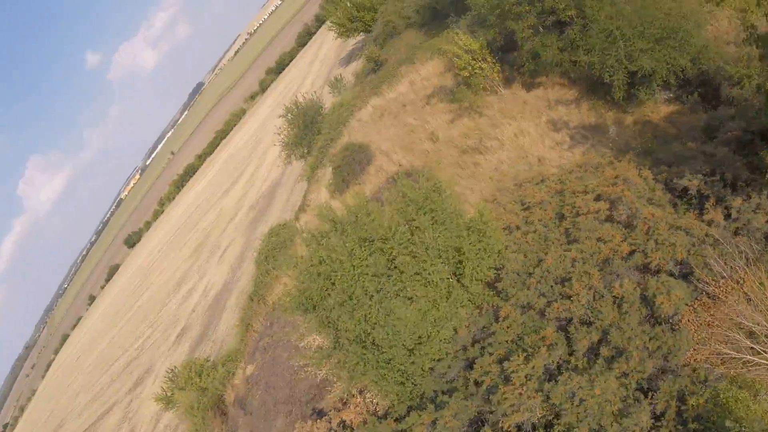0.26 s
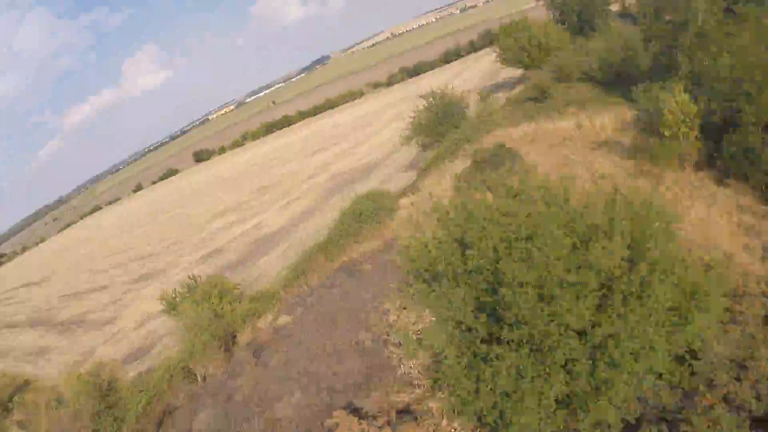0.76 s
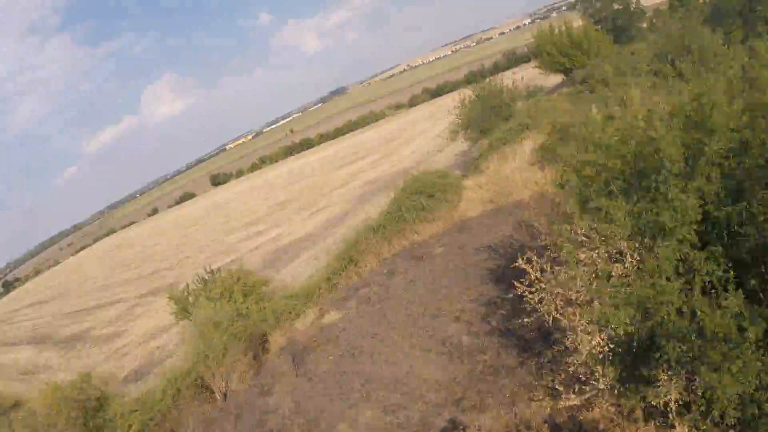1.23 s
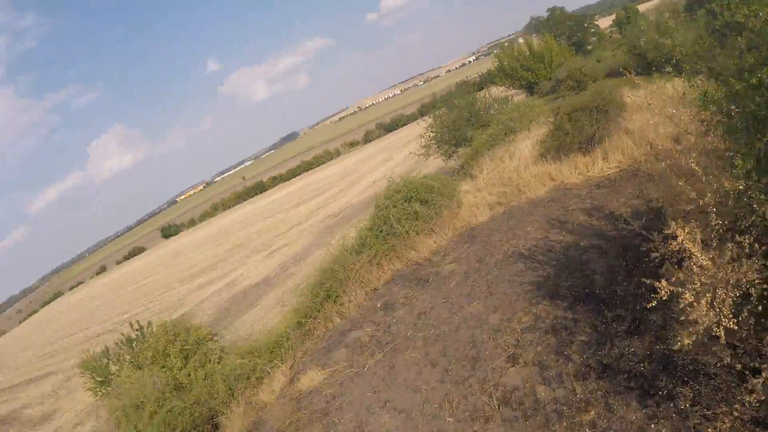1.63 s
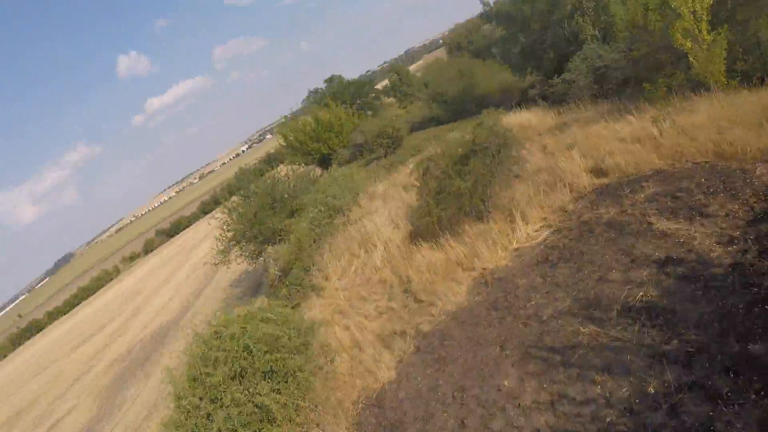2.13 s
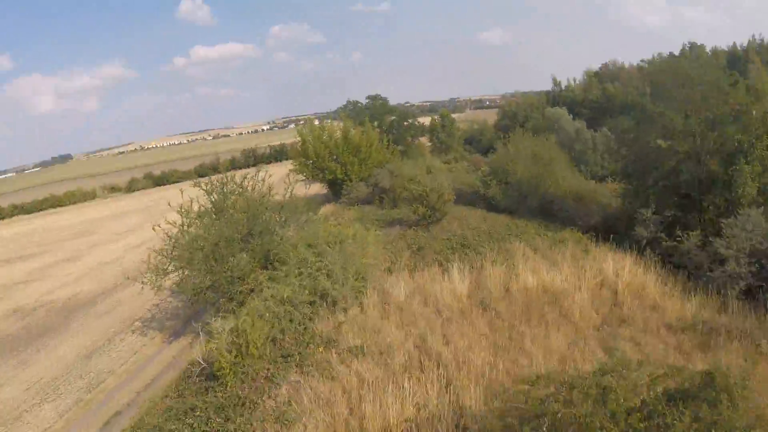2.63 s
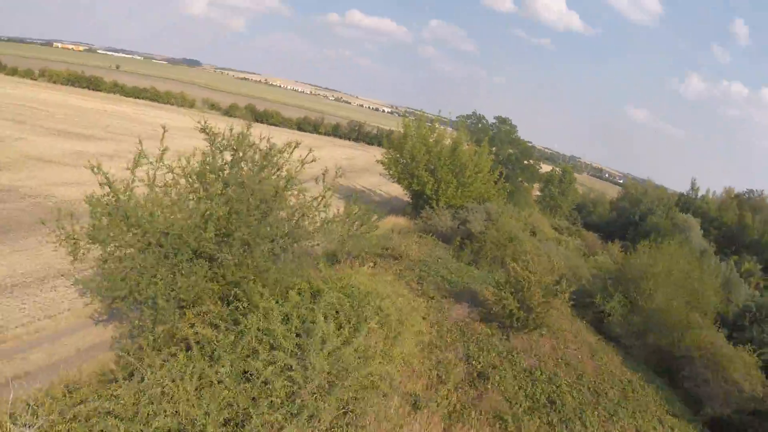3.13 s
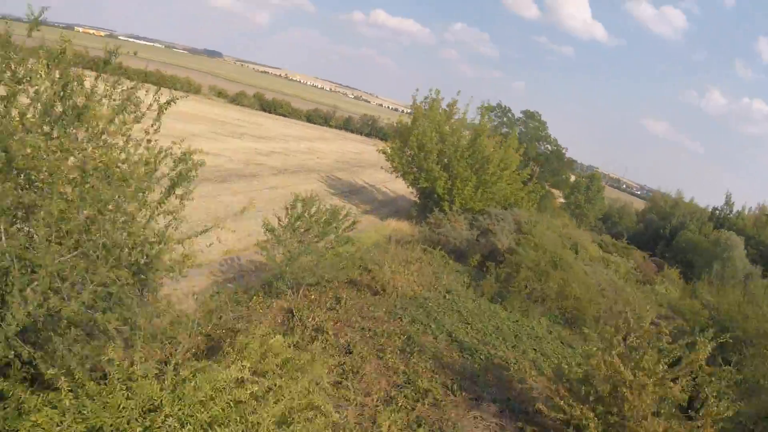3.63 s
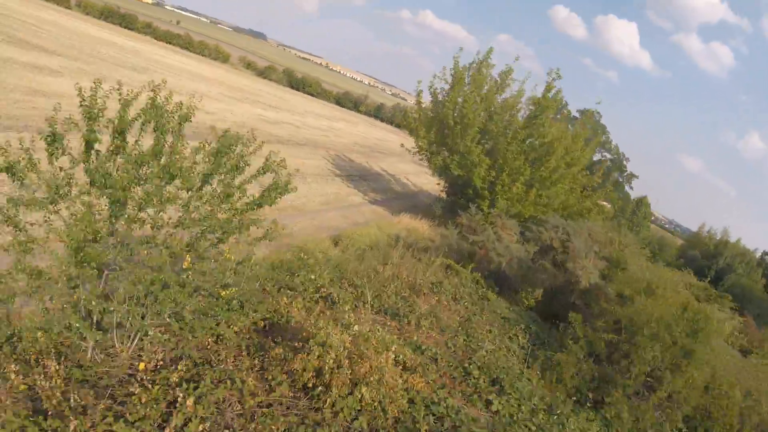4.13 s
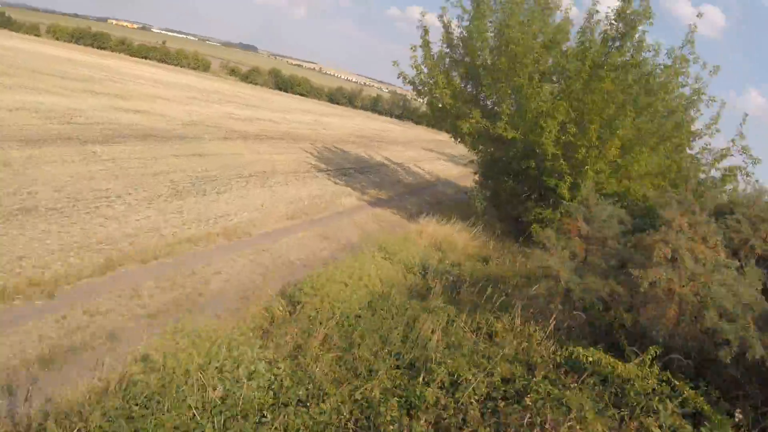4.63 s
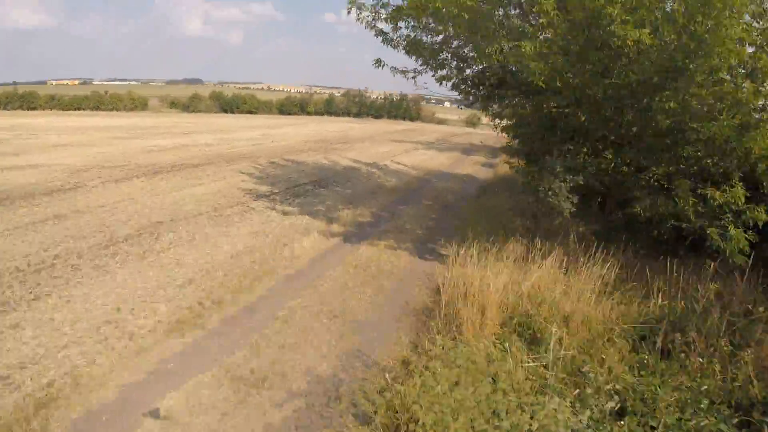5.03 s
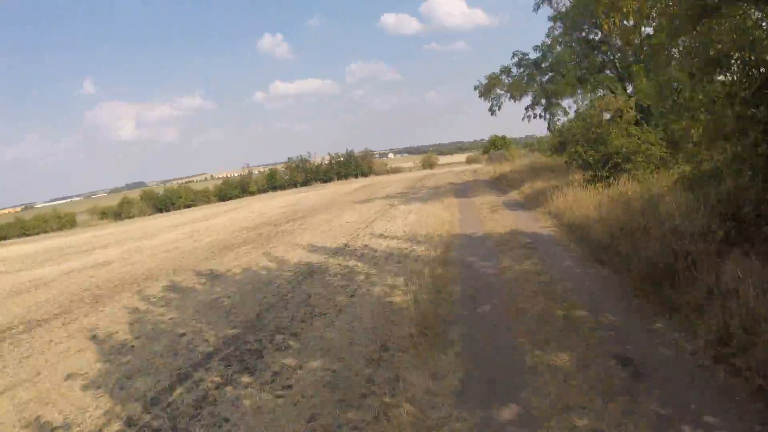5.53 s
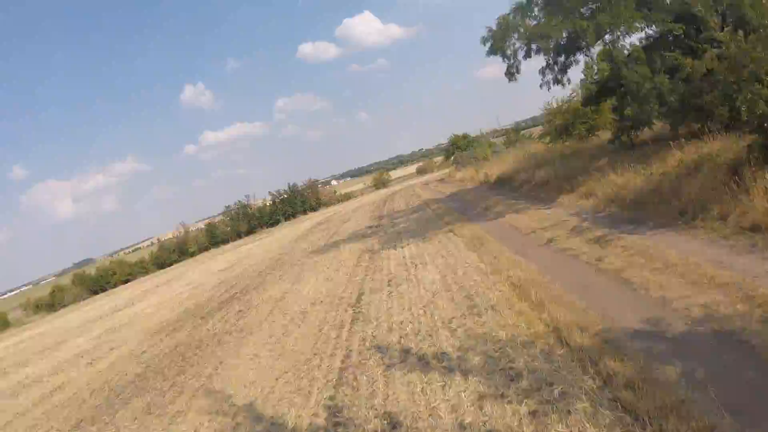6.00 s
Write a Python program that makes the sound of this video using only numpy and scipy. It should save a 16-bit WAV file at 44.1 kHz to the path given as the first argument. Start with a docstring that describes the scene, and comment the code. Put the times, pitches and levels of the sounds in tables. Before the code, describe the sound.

Four small propellers hum and buzz close up outdoors, dropping low, screaming upward, falling back, then climbing again to a wavering cruise amid airy hiss.

```python
"""Four three-blade rotors of a racing quadcopter idle, spin up, ease off and cruise, near a camera on its frame.
Each rotor turns at its own speed, so the hums beat; each is a sum of tones at multiples of its shaft speed.
Filtered noise adds the pulsing hiss of air over the blades, brief shudders and rings of the frame,
the airstream rumbling on the camera case, and a thin whistle that glides about 7 kHz."""
import sys
import numpy as np
from scipy import signal
from scipy.fft import rfft, irfft, next_fast_len
from scipy.io import wavfile
from scipy.ndimage import uniform_filter1d, minimum_filter1d

SR = 44100
rng = np.random.default_rng(int(sys.argv[2]) if len(sys.argv) > 2 else 0)


def unload_wav(signal):
    """Save mono or channel-first audio to the path in sys.argv[1] as 16-bit WAV at rate SR, clipped to [-1, 1]."""
    wavfile.write(
        sys.argv[1],
        SR,
        np.round(np.clip(np.atleast_2d(signal).T, -1, 1) * 32767).astype(np.int16),
    )


N = 276066
TIME = np.arange(N) / SR  # seconds

# The badly balanced rotor, which hums loudest and mostly turns slower than the second.
# Each row: time in seconds, shaft speed in Hz (turns per second), swell of its hum in dB.
LOUD_ROTOR = [(0, 80.96, -7), (.24, 75, -11), (.3, 83, -13), (.47, 88, -9), (.72, 80.3, -17),
              (.8, 88.1, -14), (.92, 88.7, -16), (1.05, 130.5, 4.5), (1.11, 144, -12), (1.17, 181, -10),
              (1.25, 179, -9), (1.3, 207, -3), (1.75, 237, -2.5), (1.92, 236.7, 2), (2.18, 246.8, 0),
              (2.28, 193, -1.5), (2.38, 185.9, -0.5), (2.52, 154.5, -1.5), (3.82, 154.1, 1),
              (3.97, 180.5, 0.5), (4.13, 204.6, 3), (4.33, 210.5, -1), (4.5, 192.9, 0.5),
              (5.22, 207.4, -1.5), (5.55, 186.5, -1.5), (6.05, 192.9, 0), (6.26, 187.2, 1.5)]


def rotors(speeds, shake_db):
    """Add the tones of all four rotors, and the pulsing of their blades."""
    # The four rotors: loud one, the one that follows the throttle directly, third, fourth.
    # Each row: once-a-turn hum in dB, twice-a-turn hum in dB, its rise in dB per octave of speed,
    # blade-pass tone in dB, its rise in dB per octave, buzz in dB, whine in dB.
    # The two rises count from hover speed; the whine level is for cruise speed.
    rotor_levels = [(-10, -18, 1.5, -19, -15.5, -35.5, -56.5), (-18, -32.5, 1.5, -25.5, 3, -38.5, -48),
                    (-21.5, -38, 15.5, -29.5, 2.5, -36, -53.5), (-25, -28.5, 6.5, -28.5, 1, -39, -57.5)]
    # Changing whine of the second rotor.
    # Each row: time in seconds, swell in dB, frequency in Hz where the whine is strongest.
    second_whine = [(1.2, 3.5, 1700), (1.7, 6, 2150), (1.98, 5, 3202), (2.15, -6, 2900), (2.23, -1, 3496),
                    (2.6, -7, 1100), (4.9, 0, 1350), (5.12, -6.5, 4101), (5.7, -1, 2802)]
    _, hum_swell_db = curves(LOUD_ROTOR)
    whine_swell_db, whine_hz = curves(second_whine)
    loud = rotor(speeds[0], rotor_levels[0], shake_db, strong_hz=1250,
                 hum_swell_db=hum_swell_db, drone_boost_db=drone_db())
    second = rotor(speeds[1], rotor_levels[1], shake_db, whine_hz, whine_swell_db=whine_swell_db)
    third = rotor(speeds[2], rotor_levels[2], shake_db, strong_hz=1550)
    fourth = rotor(speeds[3], rotor_levels[3], shake_db, strong_hz=2400)
    tones, chop = np.sum((loud, second, third, fourth), axis=0)
    return tones, chop / chop.std()


def rotor(hz, levels, shake_db, strong_hz, hum_swell_db=0, drone_boost_db=0, whine_swell_db=0):
    """One rotor's hum, buzz and flickering whine, and the pulsing of its blades."""
    hover_hz = 150
    punch_db = 7  # the blades bite harder until the airflow has caught up
    wander, punch_wander, flutter = .0035, 0.008005, 0.00501  # shares of the shaft speed
    once_db, twice_db, twice_rise, blade_db, blade_rise, buzz_db, whine_db = levels
    load = punch(hz)
    angle = spin(hz, wander + punch_wander * load, flutter)  # a punch unsettles the speed
    octaves = np.log2(hz / hover_hz)
    hum_db = (once_db + hum_swell_db,
              twice_db + twice_rise * octaves + hum_swell_db,
              blade_db + blade_rise * np.maximum(octaves, 0) + drone_boost_db + punch_db * load)
    low_tones = hum(angle, hz, hum_db, waver_db=1.5) + buzz(angle, hz, buzz_db + shake_db, blade_db=3.5)
    flickering_db = whine_db + whine_swell_db + effort_db(hz) + 1.5 * walk(11)
    tones = low_tones + whine(angle, hz, flickering_db, strong_hz, rough=.42)
    pulsing = partial(angle, order=3) + partial(angle, order=1)
    return tones, pulsing


def hum(angle, hz, levels_db, waver_db):
    """Unbalance and three blades shake the frame 1, 2 and 3 times a turn; its resonances lift passing tones."""
    # How the frame carries the hums to the camera, with its main resonance near 255 Hz.
    # Each row: frequency in Hz, gain in dB.
    frame_response = [(75, -12.5), (125, -1), (155, -2), (200, -1.5), (236, -3), (255, 7.5), (275, -2.5),
                      (310, -2), (400, -3.5), (470, 1), (540, 1.5), (600, -2.5), (720, -2.5), (950, -16.5)]
    total = 0
    for order, db in enumerate(levels_db, 1):
        level = undb(db + waver_db * walk(14))
        total = total + response(frame_response, order * hz) * level * partial(angle, order)
    return total


def buzz(angle, hz, db, blade_db, count=10):
    """Shaft orders 4 to 9 come through the case, which passes little above 1 kHz; blade orders are stronger."""
    # How the case passes the buzz. Each row: frequency in Hz, gain in dB.
    case_response = [(300, -12), (450, 10.5), (620, 0.5), (760, -8.5), (930, -16), (1080, -23),
                     (1300, -34.5), (2500, -57.5)]
    tones = 0
    for order in range(4, count):
        blade_boost = undb(blade_db * (order % 3 == 0))
        tones = tones + response(case_response, order * hz) * blade_boost * partial(angle, order)
    return tones * undb(db + 2.8 * walk(22))


def whine(angle, hz, db, strong_hz, rough, octaves=0.56, rest_db=-13, count=11):
    """Overtones of the blade passage, loudest in one region, roughened by the eddies that the blades cut."""
    # Overall tone colour of the whine. Each row: frequency in Hz, gain in dB.
    blade_response = [(700, -4.5), (1100, 0), (1750, -0.5), (2150, 0.5), (2700, -1.5), (3650, -3),
                      (4500, -3.5), (6400, -10), (7300, -15), (10000, -37.5)]
    tones = 0
    for order in 3 * np.arange(2, count):  # three blades pass in each turn
        nearness = np.exp(-(np.log2(order * hz / strong_hz) / octaves) ** 2)
        region_gain = undb(rest_db * (1 - nearness))
        tones = tones + response(blade_response, order * hz) * region_gain * partial(angle, order)
    return tones * undb(db) * (1 + rough * walk(70))


def punch(hz):
    """How far, 0-1, a shaft runs ahead of the airflow it draws, which follows with a lag."""
    full_lead_hz, inflow_lag_s = 35.3, 0.21
    keep = np.exp(-1 / (inflow_lag_s * SR))
    inflow_hz = hz[0] + signal.lfilter([1 - keep], [1, -keep], hz - hz[0])
    return np.clip((hz - inflow_hz) / full_lead_hz, 0, 1)


def effort_db(hz):
    """A rotor whines more the faster it turns, and while it brakes."""
    cruise_hz, rise_db_per_octave = 240, 21
    brake_db, full_brake_hz_per_s = 3.5, 550
    slowing = -np.gradient(uniform_filter1d(hz, size=2000)) * SR  # Hz per second
    return rise_db_per_octave * np.log2(hz / cruise_hz) + brake_db * np.clip(slowing / full_brake_hz_per_s, 0, 1)


def drone_db():
    """Boost of the loud rotor's blade-pass tone: each drone sets in quickly, holds and dies away."""
    # Near idle the loud rotor's blade-pass tone swells into a loud drone. # Each row: start in seconds, end in
    # seconds, boost in dB.
    drones = [(0.3, 0.628, 9), (0.81, 0.985, 9)]
    attack_s, release_s = .03, 0.21
    total = 0
    for start, end, db in drones:
        nearest_edge = np.minimum((TIME - start) / attack_s, (end - TIME) / release_s)
        total = total + db * np.clip(nearest_edge + .5, 0, 1)
    return total


def shaft_speeds():
    """Speeds of the four rotors in Hz; steering sets the last two against the throttle."""
    # Throttle: idle, punch, ease off, cruise. Each row: time in seconds, second rotor's speed in Hz.
    throttle_path = [(0, 113), (.88, 89), (1.0, 132.5), (1.1, 212.9), (1.2, 263), (1.35, 284.9),
                     (1.55, 297.3), (1.87, 299), (2.18, 310), (2.3, 223.6), (2.48, 168), (3.82, 179),
                     (4.15, 244.8), (4.36, 243.7), (4.47, 225), (5.0, 240), (5.13, 258.6), (5.3, 252.5),
                     (5.5, 229), (6.0, 237), (6.26, 237.1)]
    # Each row: time in seconds, third rotor's speed ratio to the throttle, fourth rotor's ratio.
    steering = [(0, 1.095, 0.9), (.87, 1.4, 1.56), (1.02, .88, .95), (1.2, .8, 1.01), (1.5, 0.95, 0.94),
                (2.15, 0.83, 0.86), (2.5, 0.91, 0.93), (3.8, .92, 0.91), (4.2, 0.9, 0.88),
                (4.8, 1.033, 1.01), (6.26, 1.09, 0.87)]
    loud, _ = curves(LOUD_ROTOR)
    throttle, = curves(throttle_path)
    third, fourth = curves(steering)
    return loud, throttle, third * throttle, fourth * throttle


def spin(hz, wander, flutter):
    """Shaft angle in radians; the flight controller's nudges are random slow and fast speed changes."""
    speed = hz * (1 + wander * walk(9.63) + flutter * walk(55.2))
    return 2 * np.pi * (np.cumsum(speed) / SR + rng.random())


def partial(angle, order):
    """Unit-rms tone at a multiple of the shaft speed, with a random phase."""
    return np.sqrt(2) * np.sin(order * angle + 2 * np.pi * rng.random())


def frame():
    """The arms shudder briefly in gusts, and the motors ring thinly near idle: noise in narrow bands."""
    # Gusts. Each row: time of the peak in seconds, level in dB, half length in seconds.
    shudders = [(.93, -14.5, 0.048), (1.18, -16.5, 0.077), (2.22, -21, 0.0631), (4.23, -8, 0.022),
                (4.385, -11.5, 0.0507), (5.1, -6, 0.029)]
    # Thin rings near idle. Each row: time of the peak in seconds, level in dB, half length in seconds.
    idle_rings = [(.37, -51.5, 0.055), (.53, -60, 0.083), (.91, -52.5, .025)]
    return swells(shudders) * ringing(245.0, 47) + swells(idle_rings) * ringing(5830, 70)


def airflow(buffet_db, wash_db, rush_db, hiss_db, shake_db, chop):
    """Wind rumbles on the case and rings its cavity; the air noise of the blades pulses as they pass."""
    # Tone colours of wind on the case, its cavity, propeller wash, rush over the blades and
    # blade-tip hiss. Each row: frequency in Hz, relative level in dB.
    buffet_spectrum = [(15, -16.5), (30, -4.5), (60, 4.5), (100, 5.5), (170, 0.5), (260, -7.5), (400, -16),
                       (900, -58.5)]
    cavity_spectrum = [(100, -10), (220, -4), (280, 5.5), (360, -4), (460, -3.5), (530, 0), (670, -0.5),
                       (790, -5.5), (900, -11.5), (1050, -33), (1600, -48), (3000, -73)]
    wash_spectrum = [(500, 0), (1000, 2.5), (1300, 2.5), (1800, -2.5), (2300, -7.5), (2750, -8),
                     (3400, -18), (5000, -39)]
    rush_spectrum = [(1500, -14), (2300, -8), (2900, 0), (3700, -1.5), (4700, -2), (5400, -2), (6500, -20),
                     (9000, -43.5)]
    hiss_spectrum = [(4000, -26.5), (5000, -11), (5600, -0.5), (6300, 2.5), (7300, -4.5), (8700, -9.5),
                     (10000, -17.5), (12000, -29.5), (15000, -53.5)]
    # The airstream sizzles briefly on an edge.
    # Each row: time of the peak in seconds, level in dB, half length in seconds.
    sizzles = [(2.75, -60, 0.1), (3.05, -48, 0.24)]
    buffet = coloured(buffet_spectrum) * undb(buffet_db + 2.5 + 2.6 * walk(12.0))
    cavity = coloured(cavity_spectrum) * undb(-23.0 + 0.1 * shake_db + 0.76 * walk(29.0))
    wash = coloured(wash_spectrum) * undb(wash_db + 1.0)
    rush = coloured(rush_spectrum) * undb(rush_db)
    hiss = coloured(hiss_spectrum) * undb(hiss_db)
    sizzle = swells(sizzles) * ringing(7240, 1100)
    eddies = undb(.5 * walk(60) + 0.79 * walk(28))
    blade_air = (wash + rush + hiss + sizzle) * (1 + 0.15 * chop) * eddies
    return buffet + cavity + blade_air


def air_levels(mean_hz):
    """Relative levels in dB of buffeting, wash, rush and hiss, from rotor speed, wind and turbulence."""
    # Air noise grows with the mean rotor speed. Each row: shaft speed in Hz, relative level in dB of
    # propeller wash, of rush over the blades, of blade-tip hiss.
    air_by_speed = [(108.9, -42, -58.5, -59), (163, -42, -46, -48.5), (225, -39.5, -46.5, -45),
                    (286, -33.5, -45.5, -42.5)]
    # Roughness of the air flown through. Each row: time in seconds, dB over calm cruise.
    turbulence = [(0, 9.5), (.27, 7), (.34, -1.5), (.62, -5.5), (.88, 0), (1.04, 4.5), (1.25, 1.5),
                  (1.9, 5), (2.4, 2), (3.0, 1.5), (3.6, -1.5), (4.65, -3.5), (4.8, 0), (5.35, -1),
                  (6.26, 4.5)]
    # Wind on the case, stronger in the opening dive. Each row: time in seconds, relative level in dB.
    headwind = [(0, -23.5), (1.3, -25.5), (2.4, -27.5), (6.26, -27.5)]
    wash_share, hiss_share, buffet_share = 0.3, 0.47, 0.17  # dB for each dB of turbulence
    speed, *columns = np.transpose(air_by_speed)
    wash_db, rush_db, hiss_db = (np.interp(mean_hz, speed, c) for c in columns)
    rough_db, = curves(turbulence)
    wind_db, = curves(headwind)
    return (wind_db + buffet_share * rough_db,
            wash_db + wash_share * rough_db,
            rush_db + rough_db,
            hiss_db + hiss_share * rough_db)


def whistle(width_hz=110):
    """A narrow band of noise that glides about 7 kHz: slow noise shifted up by a gliding tone."""
    # A thin, wavering whistle high over the motors.
    # Each row: time in seconds, pitch in Hz, level in dB.
    whistle_path = [(0, 7200, -85), (.42, 7350, -68), (.62, 6750, -69), (.8, 6900, -79), (4, 7210, -69),
                    (4.17, 7227, -54), (4.9, 7200, -61.5), (5.13, 7336, -51), (5.4, 7097, -61),
                    (6.26, 7130, -63)]
    hz, db = curves(whistle_path)
    angle = 2 * np.pi * np.cumsum(hz) / SR
    return undb(db) * (walk(width_hz) * np.sin(angle) + walk(width_hz) * np.cos(angle))


def undb(db):
    """Decibels to gain."""
    return 10 ** (np.asarray(db) / 20)


def curves(table):
    """Each column of a table after its times, joined by straight lines in time."""
    s, *columns = np.transpose(table)
    return [np.interp(TIME, s, c) for c in columns]


def response(points, hz):
    """Gain of a spectrum at the given frequencies; silent above its last point."""
    f, db = np.transpose(points)
    return undb(np.interp(np.log(np.maximum(hz, 1)), np.log(f), db, right=-np.inf))


def swells(table):
    """Sum of smooth rises and falls, one for each row of time, level in dB and half length."""
    return sum(undb(db) * np.exp(-((TIME - s) / length) ** 2) for s, db, length in table)


def noise(gain):
    """Unit-rms noise whose spectrum is gain(Hz)."""
    size = next_fast_len(N)
    hz = np.arange(size // 2 + 1) * SR / size
    x = irfft(rfft(rng.standard_normal(size)) * gain(hz), size)[:N]
    return x / x.std()


def coloured(points):
    """Noise shaped by a table of frequencies and levels."""
    return noise(lambda f: response(points, f))


def ringing(hz, width_hz):
    """A resonance driven by turbulence: noise peaking at one frequency."""
    return noise(lambda f: 1 / (1 + (2 * (f - hz) / width_hz) ** 2))


def walk(rate):
    """Smooth random wandering of spread 1 that changes about rate times a second."""
    return noise(lambda f: 1 / (1 + (f / rate) ** 4))


def scene():
    """Rotors, frame, air and whistle at the one microphone."""
    # How hard the higher shaft orders shake the frame. Each row: time in seconds, relative level in dB.
    shake = [(0, -2.5), (.9, -1.5), (1.4, 6.5), (2.7, 4), (3.7, 8), (4.3, 3), (6.26, -1)]
    speeds = shaft_speeds()
    shake_db, = curves(shake)
    tones, chop = rotors(speeds, shake_db)
    air = airflow(*air_levels(np.mean(speeds, axis=0)), shake_db, chop)
    return (tones + air + frame() + whistle())[None]


def record(dry, size=500):
    """The camera's limiter holds the peaks under a ceiling, then the top is cut."""
    ceiling, top_hz = .88, 14500
    gain = ceiling / np.maximum(np.abs(dry), ceiling)
    gain = uniform_filter1d(minimum_filter1d(gain, size), size)  # turns down smoothly around each peak
    fade_in = np.minimum(TIME / .004, 1)
    low_pass = signal.ellip(8, .2, 80, top_hz, fs=SR, output="sos")
    return signal.sosfilt(low_pass, dry * gain * fade_in)


dry = scene()
out = record(dry)
unload_wav(out)
```